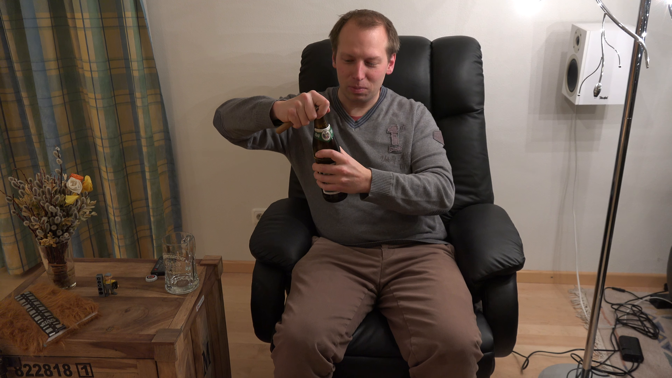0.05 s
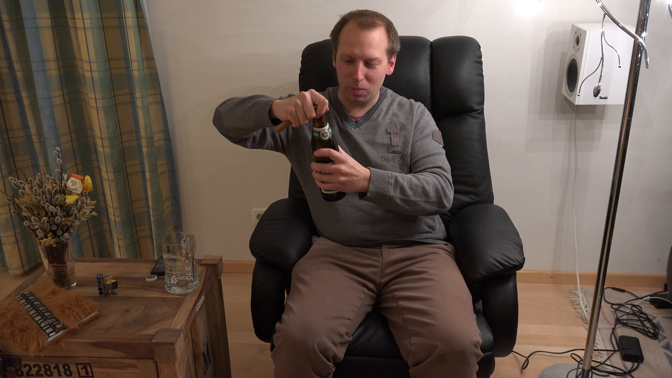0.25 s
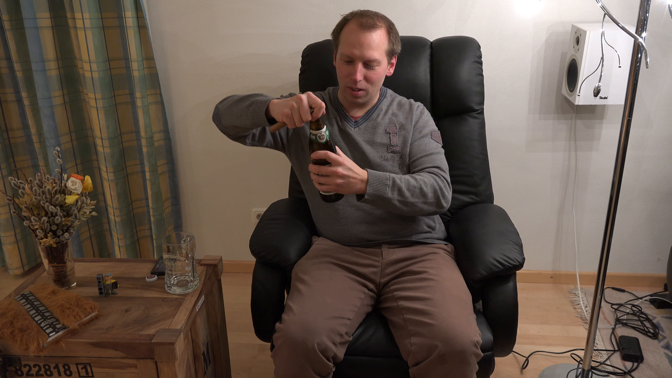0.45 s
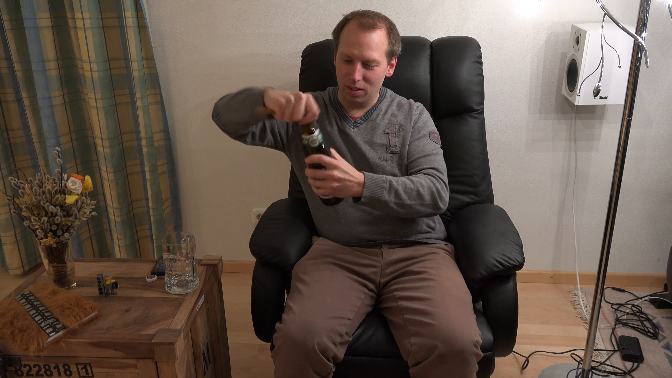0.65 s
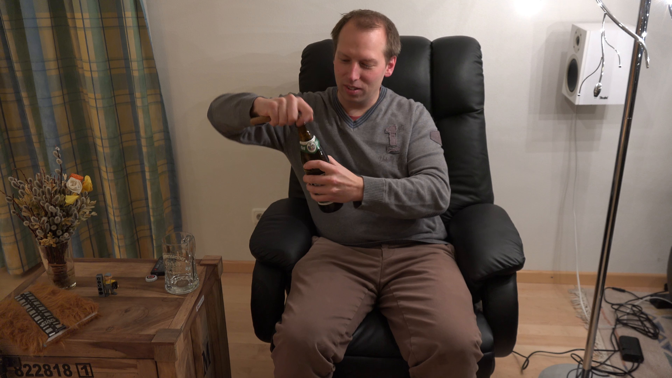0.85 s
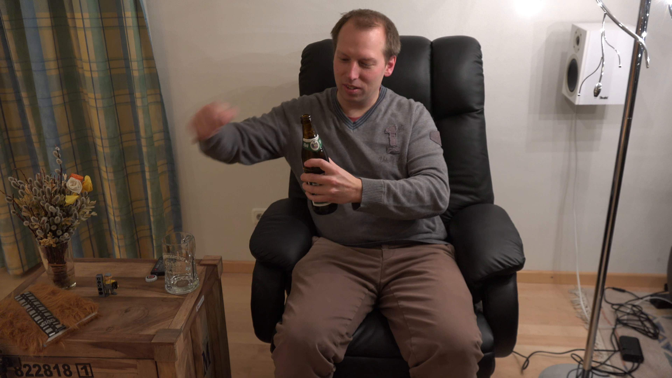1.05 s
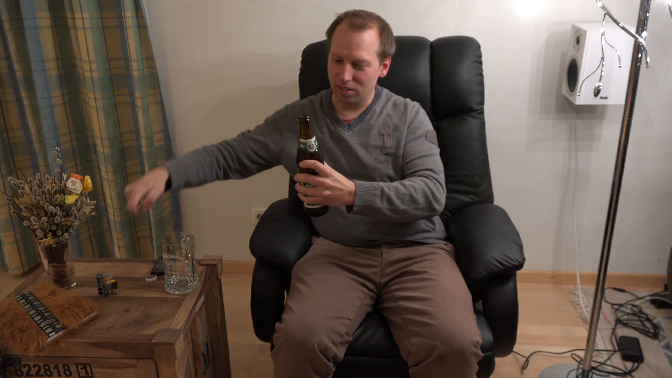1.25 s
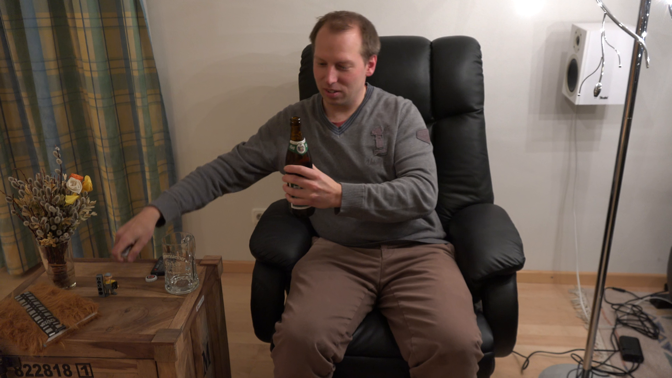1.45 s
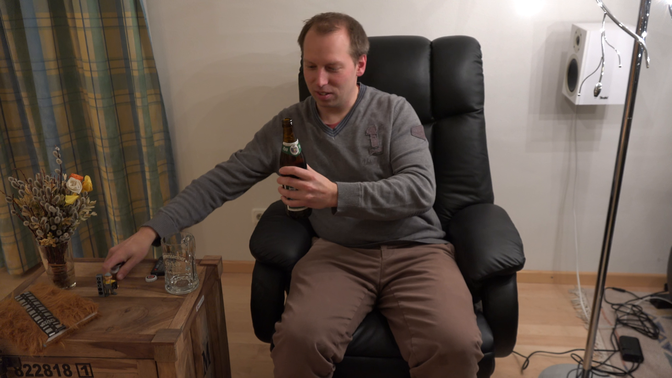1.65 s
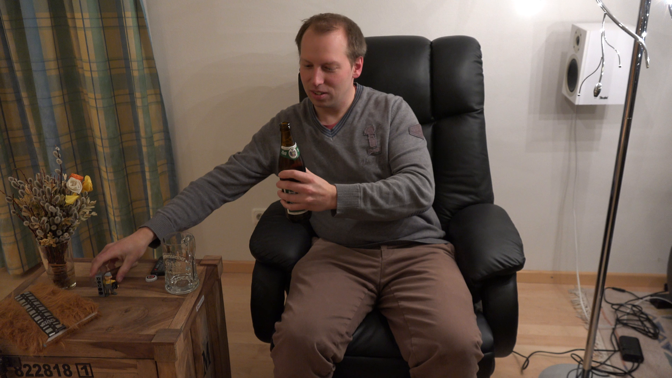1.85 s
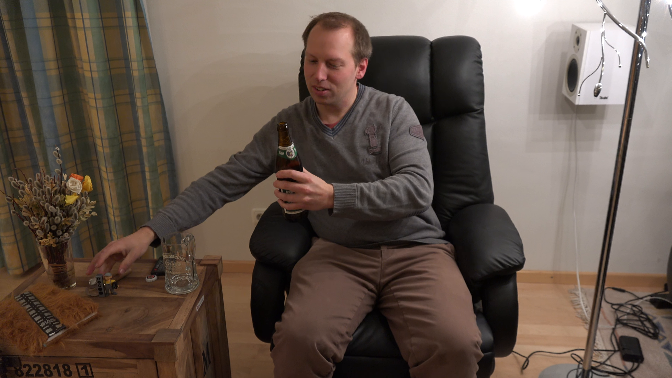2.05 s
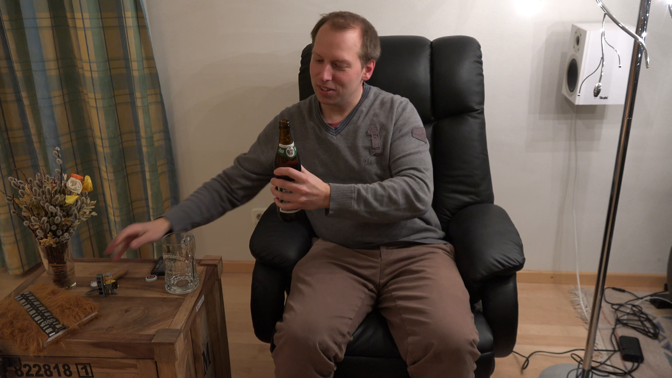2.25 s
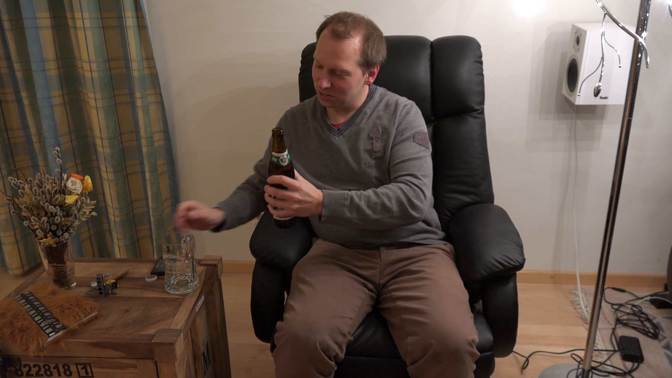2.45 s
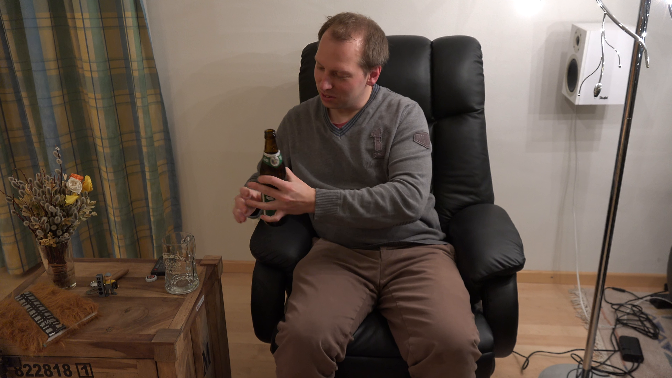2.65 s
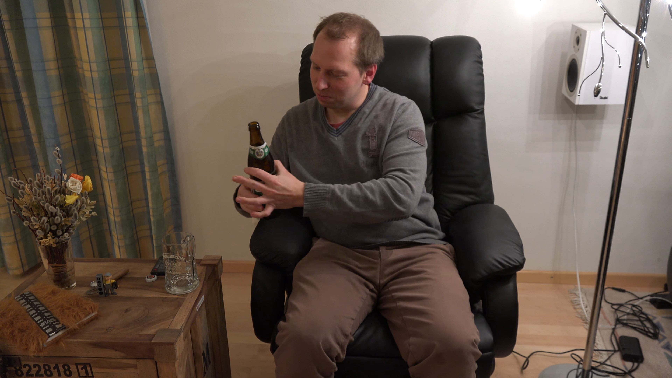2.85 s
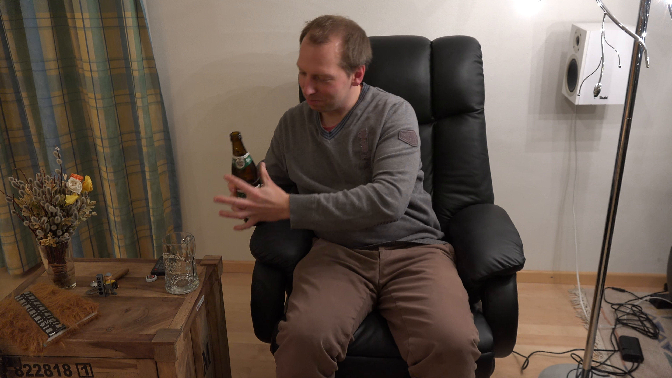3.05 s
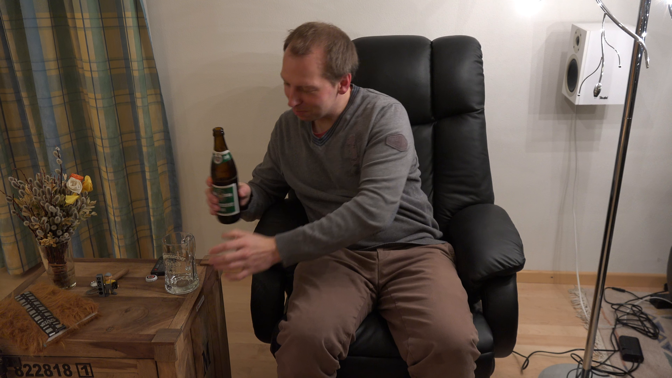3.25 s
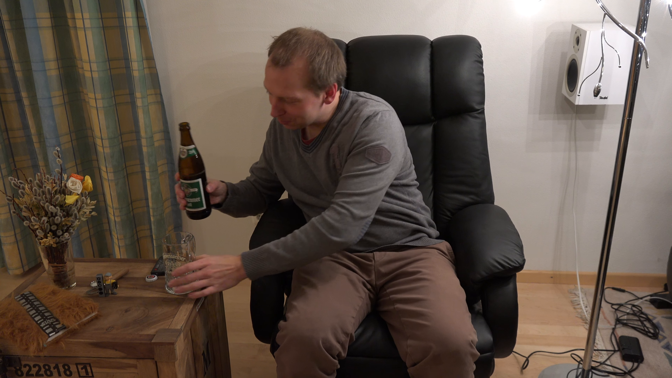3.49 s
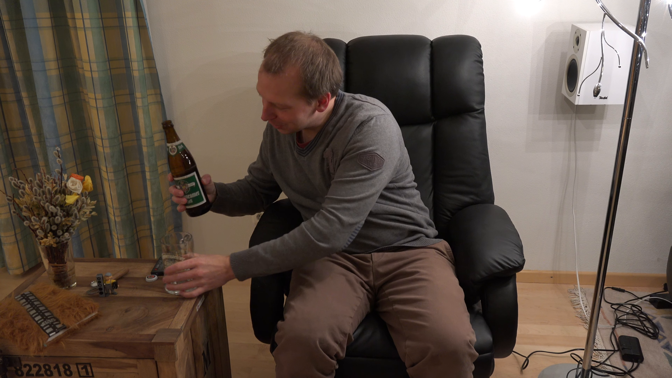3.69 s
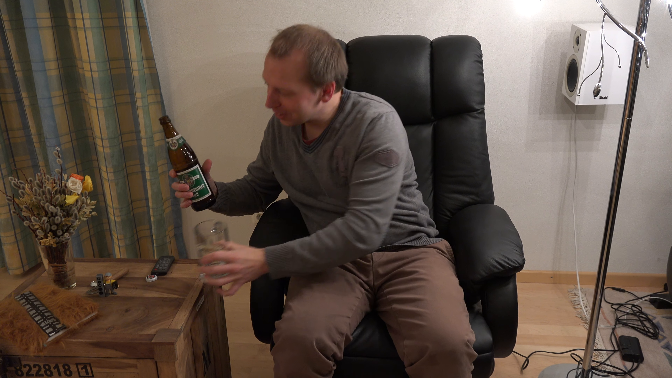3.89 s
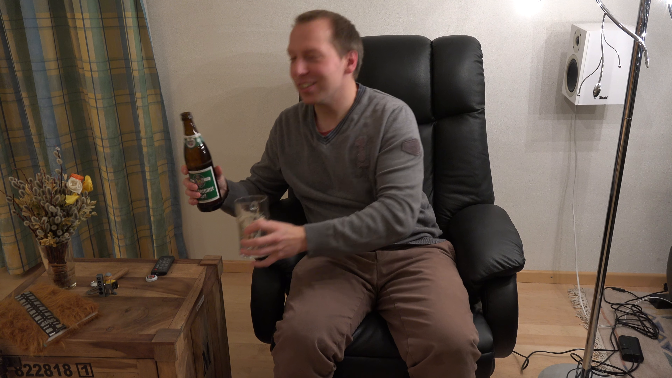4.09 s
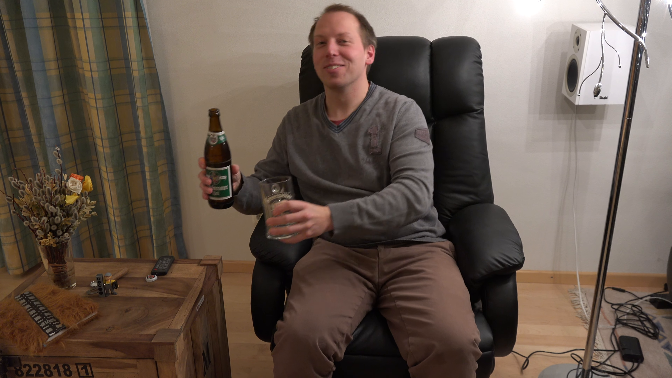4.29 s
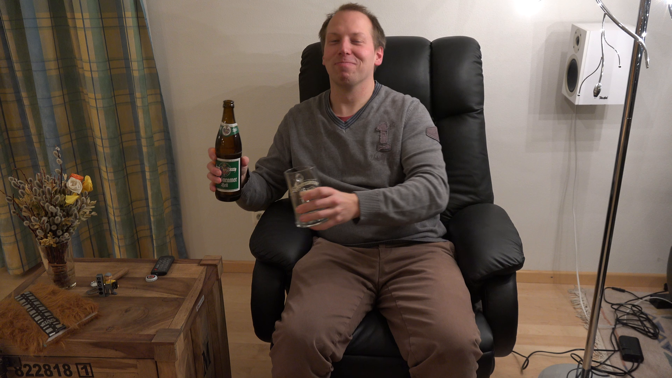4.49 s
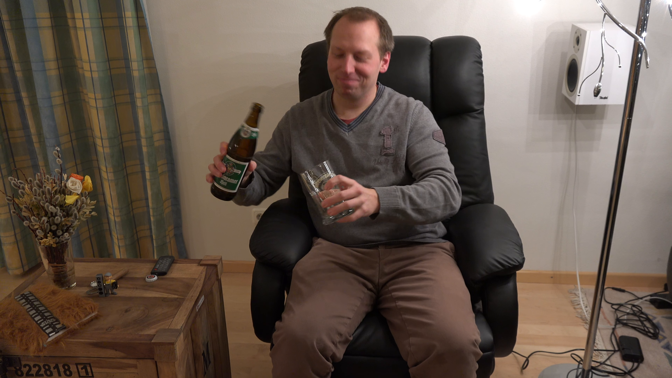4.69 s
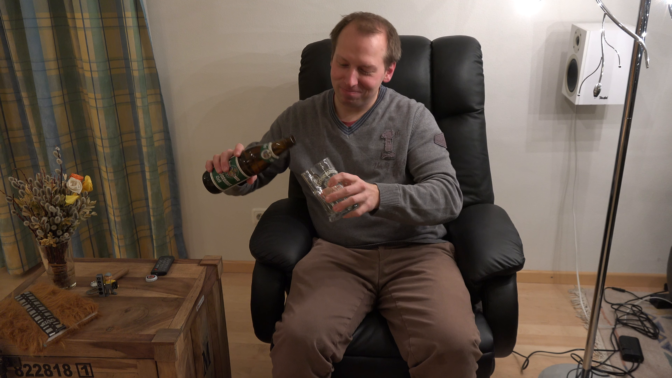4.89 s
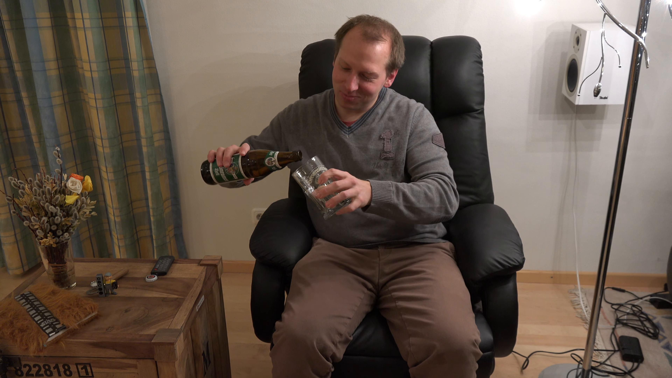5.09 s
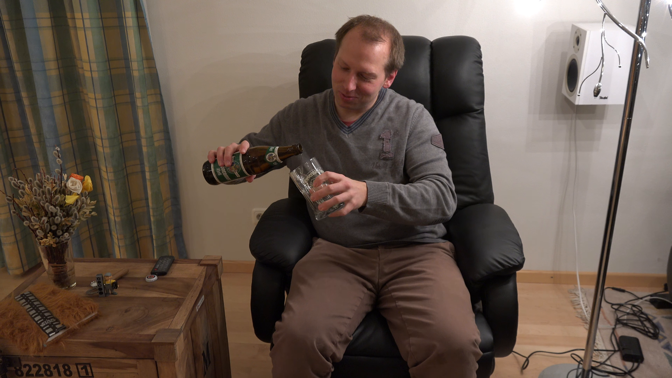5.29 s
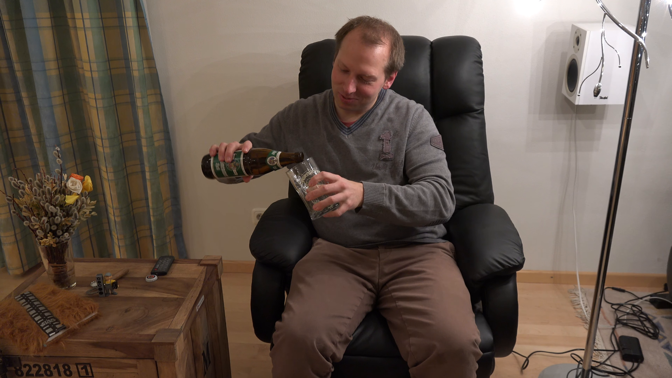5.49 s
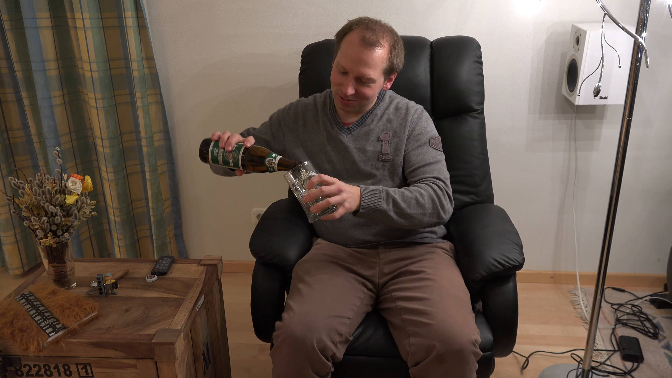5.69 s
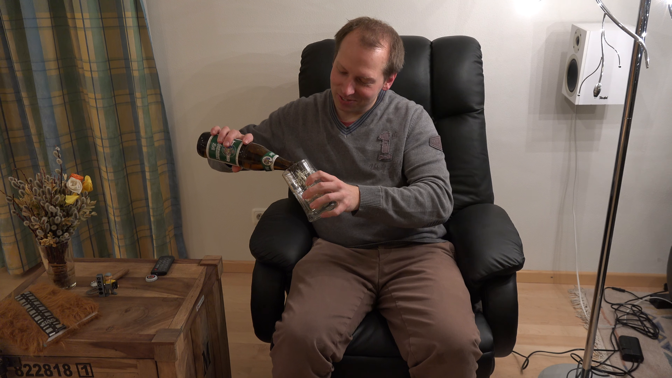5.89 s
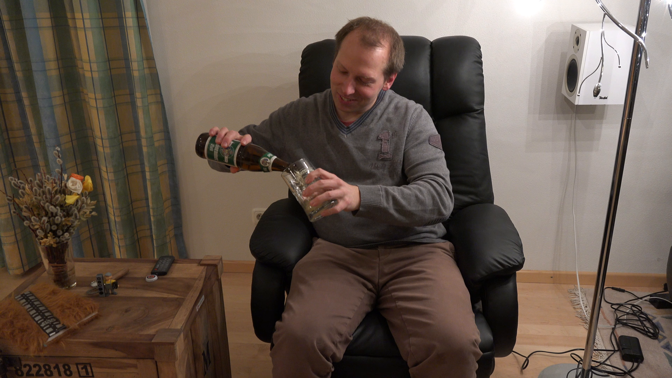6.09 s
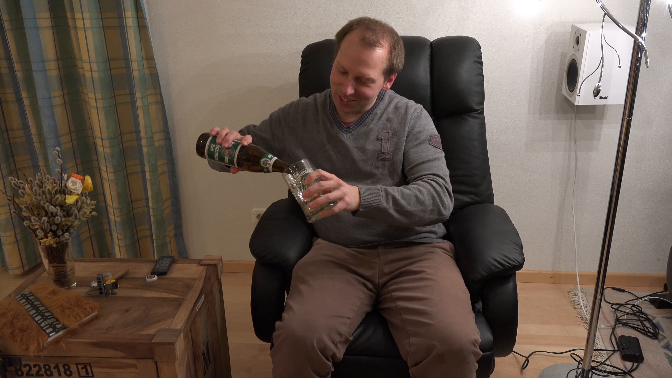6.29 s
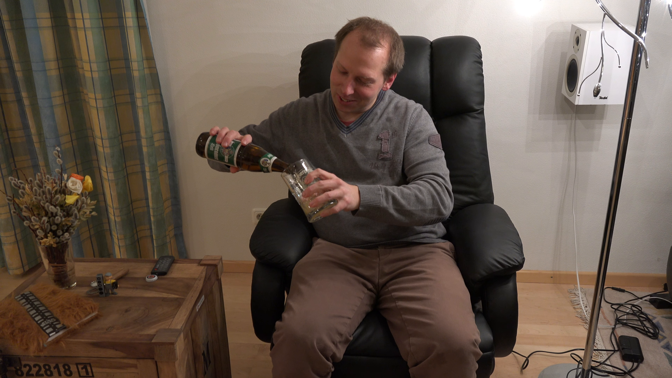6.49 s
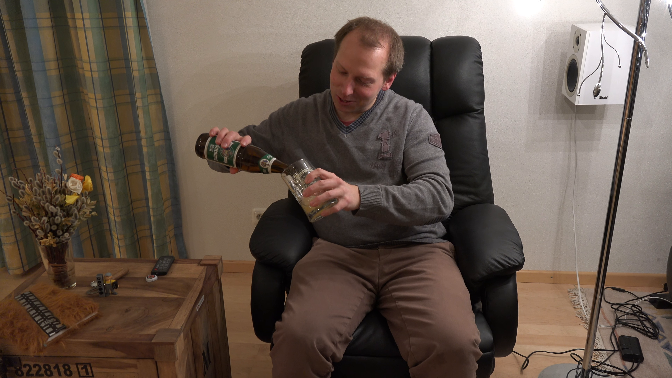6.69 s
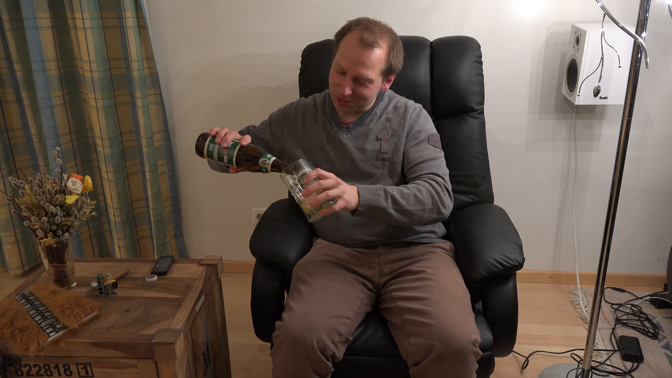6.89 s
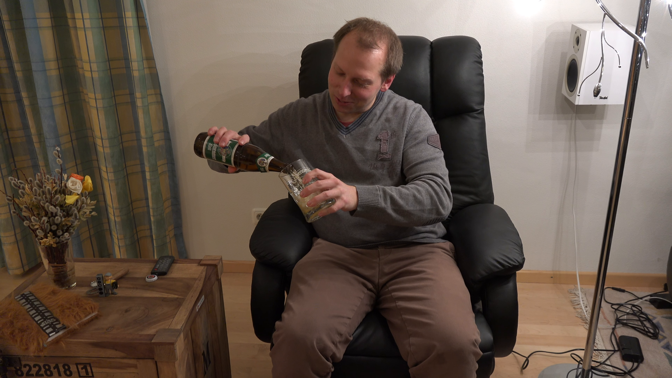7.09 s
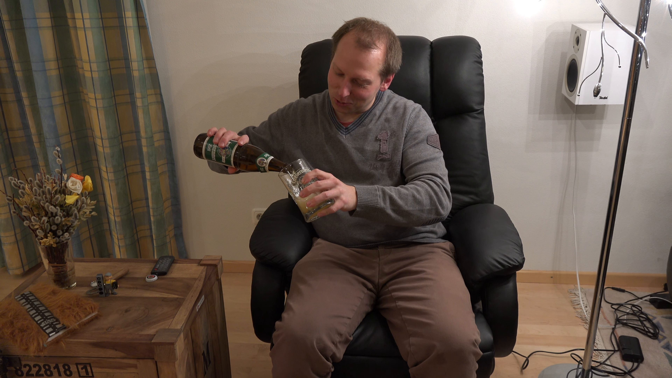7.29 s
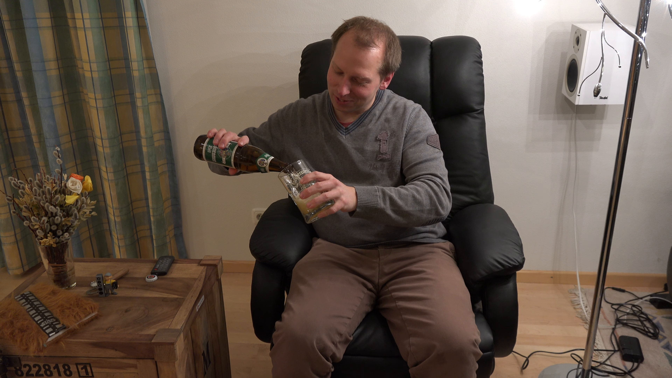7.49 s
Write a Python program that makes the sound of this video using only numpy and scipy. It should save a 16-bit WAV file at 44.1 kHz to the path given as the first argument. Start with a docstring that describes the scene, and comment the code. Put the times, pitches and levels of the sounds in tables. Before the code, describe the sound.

In a small living room with a faint low rumble, a beer bottle opens with a fading hiss and a short pop. The cap and opener tick together, then land on a wooden table in a bright, bouncing clatter, the loudest sound. Leather rubs and creaks as someone moves in an armchair, ending in a brief squeak. Finally beer pours into a glass, with softening glugs, bubbly plinks and light fizz, all with a short room echo.

```python
"""Gas hisses from under the cap of a beer bottle in a small living room, until the neck pops.
Cap and steel opener bounce on a wooden table, knocking the top and ringing the steel.
A leather armchair rubs, creaks and squeaks by stick-slip as the sitter fetches a glass.
Then the bottle glugs, each gulp ringing the air inside, and beer runs down the tilted glass,
trapping bubbles that ring under a fizzing head of foam."""
import sys
import numpy as np
from scipy import signal
from scipy.fft import rfft, irfft
from scipy.io import wavfile

SR = 44100
rng = np.random.default_rng(int(sys.argv[2]) if len(sys.argv) > 2 else 0)


def wav_record(signal):
    """Record a signal, one row per channel, as 16-bit PCM in the file named by sys.argv[1]."""
    frames = np.transpose(np.atleast_2d(signal))
    bounded = np.clip(frames, -1, 1)
    # unit amplitude maps onto the largest positive 16-bit level
    quanta = np.round(bounded * 32767).astype(np.int16)
    wavfile.write(sys.argv[1], SR, quanta)


N = 332910
T = np.arange(N) / SR
AGE = T[:SR // 2]  # time axis of one short event
TOP_HZ = 11050


def amp(db):
    """Decibels to gain."""
    return 10 ** (np.asarray(db) / 20)


def unit(x):
    """Scale to rms 1."""
    return x / np.sqrt(np.mean(x ** 2))


def at_level(x, db):
    """Scale a short sound to the energy of 10 ms at the given level."""
    return x * amp(db) / np.sqrt(np.sum(x ** 2) / (SR / 100))


def at_hz(points, hz):
    """Read a (Hz, value) table on a log-frequency axis."""
    point_hz, value = np.transpose(points)
    return np.interp(np.log(np.maximum(hz, 1)), np.log(point_hz), value)


def colour(x, points, size=4096):
    """Minimum-phase filter with the given (Hz, dB) response."""
    hz = np.arange(size // 2 + 1) * SR / size
    cepstrum = irfft(np.log(amp(at_hz(points, hz))))
    cepstrum[1:size // 2] *= 2
    cepstrum[size // 2 + 1:] = 0
    impulse = irfft(np.exp(rfft(cepstrum)))
    return signal.fftconvolve(x, impulse)[:len(x)]


def lowpass(x, hz):
    """Second-order low-pass."""
    return signal.sosfilt(signal.butter(2, min(hz, SR / 2 - 1), fs=SR, output="sos"), x)


def waver(hz, size):
    """Smooth random motion up to about hz, rms 1."""
    return unit(lowpass(rng.standard_normal(size), hz))


def since(start_s):
    """Seconds since the start, zero before it."""
    return np.maximum(T - start_s, 0)


def fade(t60_s, age=AGE):
    """Exponential decay."""
    return np.exp(-np.log(1000) * age / t60_s)


def swell(rise_s, age=AGE):
    """Exponential rise to 1."""
    return 1 - np.exp(-age / rise_s)


def ring(hz, t60_s, glide=0, age=AGE):
    """Damped mode, built up in a cycle or two; pitch climbs by the fraction glide as it dies."""
    bend = 1 + glide * np.minimum(age / t60_s, 1) / 2
    return swell(1 / hz, age) * fade(t60_s, age) * np.sin(2 * np.pi * hz * age * bend)


def burst(t60_s):
    """Decaying white noise."""
    return rng.standard_normal(len(AGE)) * fade(t60_s)


def add(track, start_s, x):
    """Mix x into the track."""
    i = max(int(start_s * SR), 0)
    track[i:i + len(x)] += x[:max(N - i, 0)]


# Background spectrum. Each row: frequency in Hz, gain in dB.
AMBIENCE_EQ = [(12, -36.5), (25, -15), (45, -6.5), (80, 0.5), (200, -2.5), (350, -8.5), (700, -15),
               (1400, -20.5), (2800, -26), (6000, -26), (11000, -33)]
def ambience(level_db=-59):
    """Steady low rumble of the room."""
    return amp(level_db) * unit(colour(rng.standard_normal(N), AMBIENCE_EQ))


# Room decay. Each row: frequency in Hz, T60 in seconds.
ROOM_DECAY = [(120, 1), (500, 0.52), (2000, 0.68), (5000, 0.52), (10000, 0.38)]
# Reverb spectrum. Each row: frequency in Hz, gain in dB.
ROOM_EQ = [(80, -4), (200, 3.5), (700, 1), (2000, -0.5), (5000, -1.5), (8000, -3), (11000, -8.5)]
def room(x, gap_s=0.0039, build_s=0.004):
    """Walls and floor answer after a few milliseconds; the treble dies first."""
    age = T[:SR * 3 // 2]
    spectrum = rfft(rng.standard_normal(len(age)))
    hz = np.arange(len(spectrum)) * SR / len(age)
    centres_hz = np.geomspace(60, 12000, 12)
    tail = 0
    for centre_hz, pick in zip(centres_hz, np.eye(len(centres_hz))):
        band = irfft(spectrum * at_hz(np.c_[centres_hz, pick], hz), len(age))
        tail = tail + band * fade(at_hz(ROOM_DECAY, centre_hz), age)
    onset = np.clip((age - gap_s) / build_s, 0, 1)
    tail = colour(tail * onset, ROOM_EQ)
    midrange = np.abs(rfft(tail))[(hz > 500) & (hz < 3000)]
    return signal.fftconvolve(x, tail / np.sqrt(np.mean(midrange ** 2)))[:N]


# Movements in the chair. Each row: start and length in seconds, level in dB, rasp offset in dB.
MOVEMENTS = [(1.23, 0.23, -58.5, -1.5), (1.463, 0.56, -51, -3.5), (1.947, 0.54, -54.5, -2.5),
             (2.404, 0.48, -62, -1), (3.016, 0.082, -51, -11), (3.14, 0.21, -38.5, -3),
             (3.402, 0.12, -44.5, -10), (3.599, 0.062, -40.5, -2), (3.755, 0.82, -58.5, -4.5),
             (3.918, 0.21, -50, -7.5), (4.162, .15, -41.5, -9.5), (4.664, .15, -40, -4)]
def rub_envelopes(attack_s=0.029, release_s=0.018, settle_db=-6, settle_s=0.074):
    """Body and rasp gains: each movement starts, holds, stops and leaves the upholstery settling."""
    body_power = rasp_power = 0
    settle = amp(settle_db)
    for start_s, length_s, db, rasp_db in MOVEMENTS:
        attack = np.minimum(since(start_s) / attack_s, 1)
        after_s = since(start_s + length_s)
        release = (1 - settle) * np.exp(-after_s / release_s) + settle * np.exp(-after_s / settle_s)
        power = (amp(db) * attack * release) ** 2
        body_power += power
        rasp_power += power * amp(rasp_db) ** 2
    return np.sqrt(body_power), np.sqrt(rasp_power)


# Spectra of the leather and its grain. Each row: frequency in Hz, gain in dB.
LEATHER_EQ = [(40, -25), (75, 0.5), (130, -3), (290, -0.5), (450, -4.5), (800, -5.5), (1000, -5.5),
              (1350, -5.5), (2000, -11.5), (3200, -37)]
GRAIN_EQ = [(900, -21.5), (1500, -0.5), (1930, 0), (2950, -4.5), (3700, -5), (4500, -6), (5900, -13.5),
            (6500, -11.5), (7200, -16.5), (11000, -31)]
# Chair frame modes. Each row: frequency in Hz, bandwidth in Hz, gain in dB.
FRAME_MODES = [(232, 410, -3.5), (355, 50, 0.5), (642, 30, 0), (750, 76, 1.5), (827, 61, 0.5),
               (1046, 39, -7.5), (1850, 130, -6), (3490, 340, -12.5)]
def leather_rub(slip_hz=130, scatter_db=4, drag_db=-3, frame_db=-7, body_db=-1, grain_db=-2):
    """Leather sticks and slips unevenly, shaking the upholstered frame; its grain adds a rasp."""
    timing, force = rng.standard_normal((2000, 2)).T
    gaps_s = np.exp(0.4 * timing) / slip_hz
    slips = np.zeros(N)
    for start_s, size in zip(np.cumsum(gaps_s), amp(scatter_db * force)):
        add(slips, start_s, np.array([size]))
    friction = unit(unit(slips) + amp(drag_db) * rng.standard_normal(N))
    modes = sum(amp(db) * width_hz * ring(hz, np.log(1000) / (np.pi * width_hz))
                for hz, width_hz, db in FRAME_MODES)
    frame = unit(signal.fftconvolve(friction, modes)[:N])
    body = unit(unit(colour(friction, LEATHER_EQ)) + amp(frame_db) * frame)
    rasp = unit(colour(friction + 1.7 * rng.standard_normal(N), GRAIN_EQ))
    body_gain, rasp_gain = rub_envelopes()
    return amp(body_db) * body_gain * body + amp(grain_db) * rasp_gain * rasp


# Sudden slips. Each row: start in seconds, level in dB, cut-off in Hz.
LEATHER_SLIPS = [(1.2537, -41, 1390), (1.4177, -39, 1300), (1.476, -41.5, 1280), (2.994, -43.5, 5940),
                 (3.062, -43, 2500), (3.098, -40.5, 2530), (3.382, -35.5, 4900), (3.449, -33.5, 5430),
                 (3.5574, -32, 5440), (3.596, -32.5, 5500), (3.627, -37.5, 4900), (4.207, -36.5, 1200),
                 (4.28, -39, 2970)]
def leather_creaks(t60_s=0.11):
    """Each sudden slip of the leather gives a snap of noise."""
    snap_eq = [(60, -10), (180, 6.5), (800, -1), (1400, -6.5),
               (2800, -9.5), (3600, -4), (7000, -11), (11000, -11.5)]
    out = np.zeros(N)
    for start_s, db, cutoff_hz in LEATHER_SLIPS:
        snap = colour(burst(t60_s), snap_eq)
        add(out, start_s, at_level(lowpass(snap, cutoff_hz), db))
    return out


def leather_squeak(start_s=4.175, attack_s=0.027, t60_s=0.6, level_db=-40.5,
                   steady_hz=986, scoop_hz=80, scoop_s=0.029, jitter=0.0196, jitter_hz=153):
    """The sitter leans back: fast, unsteady stick-slip gives a rough pitch that climbs and levels."""
    age = since(start_s)
    hz = steady_hz - scoop_hz * np.exp(-age / scoop_s)
    phase = 2 * np.pi * np.cumsum(hz * (1 + jitter * waver(jitter_hz, N))) / SR
    tone = unit(np.sin(phase) + amp(-4) * np.sin(2 * phase) + amp(-10) * np.sin(3 * phase))
    envelope = np.minimum(age / attack_s, 1) * fade(t60_s, age)
    return amp(level_db) * envelope * tone


# Metal ticks. Each row: start in seconds, level in dB, centre in Hz.
CAP_TICKS = [(.385, -55, 4800), (.397, -51.5, 4400), (.924, -60.5, 2860), (1.046, -61.5, 3587),
             (1.3, -44.5, 4113), (1.33, -43, 4100), (1.362, -53, 4320)]
def cap_ticks(t60_s=0.018, skirt_db=-16):
    """Cap and opener tick together in the hand."""
    out = np.zeros(N)
    for start_s, db, hz in CAP_TICKS:
        peak_eq = [(hz / 8, -28), (hz / 1.4, skirt_db), (hz, 0), (hz * 1.3, skirt_db), (hz * 2, -28)]
        add(out, start_s, at_level(colour(burst(t60_s), peak_eq), db))
    return out


# Leak spectrum. Each row: frequency in Hz, gain in dB.
HISS_EQ = [(600, -16), (1500, -9.5), (3100, -3.5), (4000, -4), (6500, 1), (8500, -0.5), (11000, -10.5)]
def gas_hiss(level_db=-36.5, t60_s=0.41):
    """Gas leaks under the lifted cap, dying away as the pressure falls."""
    return amp(level_db) * fade(t60_s, T) * unit(colour(rng.standard_normal(N), HISS_EQ))


# Gas puff spectrum. Each row: frequency in Hz, gain in dB.
PUFF_EQ = [(300, -30), (1100, -7), (2400, -14), (3900, -4.5), (4500, -11.5), (6200, -13), (8500, -15.5),
           (11000, -33)]
def neck_pop(start_s=0.5518, neck_hz=520, neck_db=-31, neck_t60_s=0.051, puff_db=-36, puff_t60_s=0.081):
    """The cap lets go: gas bursts out and rings the air in the neck."""
    out = np.zeros(N)
    add(out, start_s, at_level(ring(neck_hz, neck_t60_s), neck_db))
    add(out, start_s, at_level(colour(burst(puff_t60_s), PUFF_EQ), puff_db))
    return out


# Table top modes. Each row: frequency in Hz, gain in dB, T60 in seconds.
TABLE_MODES = [(198, -8, 0.13), (347, -6.5, .12), (510, -2, 0.066), (703, -3.5, 0.059), (702, -3.5, 0.15),
               (998, -8.5, 0.07), (1243, -3, 0.063), (1458, 2.5, 0.065), (1740, -2.5, 0.069),
               (2080, -1.5, 0.02), (2201, -1.5, .05), (2550, 1, .03), (2934, 0.5, .06), (3300, -2.5, 0.036)]
# Impact spectrum. Each row: frequency in Hz, gain in dB.
KNOCK_EQ = [(30, -26), (90, -16.5), (200, 2.5), (380, -3.5), (720, 3), (1000, -0.5), (1500, -1),
            (2900, -3.5), (4000, -2.5), (7000, -6.5), (11000, -9)]
def table_knock(contact_hz, crack_t60_s=0.011, thud_t60_s=0.05, modes_db=-6, low_cut_ratio=0.043):
    """One blow on wood: a soft contact has less treble, a light hard one hardly moves the low modes."""
    board = sum(rng.choice([-1, 1]) * amp(db) * ring(hz, t60_s) for hz, db, t60_s in TABLE_MODES)
    crack = at_level(burst(crack_t60_s), 0)
    thud = at_level(burst(thud_t60_s), 0)
    impact = colour(crack + thud, KNOCK_EQ)
    wood = lowpass(at_level(impact, 0) + at_level(board, modes_db), contact_hz)
    low_cut = signal.butter(1, low_cut_ratio * contact_hz, "high", fs=SR, output="sos")
    return signal.sosfilt(low_cut, wood)


# Opener modes. Each row: frequency in Hz, gain in dB, T60 in seconds, group (0 low, 1 middle, 2 high).
OPENER_MODES = [(4736, -1.5, 0.1, 0), (4816, -9, .1, 0), (5780, -16.5, 0.022, 0), (6150, -16, 0.066, 0),
                (6790, -5, 0.068, 1), (7260, -13, 0.027, 1), (8730, -6.5, 0.013, 2), (9100, -7.5, 0.042, 2)]
# Bounces. Each row: start in seconds, wood level in dB, contact cut-off in Hz, steel gain in dB,
# strike place (0 rings the low modes, 1 the middle ones).
BOUNCES = [(1.607, -59.5, 3080, -45.5, 0.074), (1.6888, -26.5, 3200, -42.5, 0.35),
           (1.697, -28.5, 4913, -27, .17), (1.714, -25, 5476, -21, 0.76),
           (1.7679, -30.5, 11040, -15.5, 0.23), (1.783, -41.5, 8710, -28.5, 0.28),
           (1.809, -14, 1647, -30.5, .15), (1.838, -24.5, 2300, -32.5, 0.14),
           (1.8599, -10.5, 4436, -30, 0.28), (1.875, -14.5, 3283, -30, .15),
           (1.896, -27, 4260, -29.5, 0.67), (1.914, -27.5, 2250, -41, 0.78), (1.9593, -47, 3703, -31, 0.21),
           (2.0201, -51, 3240, -26, 0.1), (2.038, -33, 4500, -35.5, 0.91), (2.1721, -33, 4770, -30.5, 0.64)]
def clatter(chatter_depth=0.46, chatter_hz=200, hard_contact_hz=5000, detune=0.0007):
    """Each bounce knocks the table and rings the steel, which chatters against the wood."""
    out = np.zeros(N)
    for start_s, wood_db, contact_hz, steel_db, place in BOUNCES:
        add(out, start_s, at_level(table_knock(contact_hz), wood_db))
        angle = place * np.pi / 2
        hardness = 1 / (1 + (hard_contact_hz / contact_hz) ** 2)  # sharp contacts wake the high modes
        group_gains = np.cos(angle), np.sin(angle), hardness
        for hz, db, t60_s, group in OPENER_MODES:
            chatter = 1 + chatter_depth * waver(chatter_hz, len(AGE))
            mode = ring(hz * (1 + detune * rng.standard_normal()), t60_s)
            add(out, start_s, group_gains[group] * at_level(chatter * mode, db + steel_db))
    return out


# Air pocket modes. Each row: frequency ratio, gain in dB.
CAVITY_MODES = [(1, -6.5), (1.95, -9.5), (3.03, -4.5), (3.8, -28), (4.03, -2.5), (5.95, -8), (7, -18)]
# Thump spectrum. Each row: frequency in Hz, gain in dB.
THUMP_EQ = [(70, -11), (150, 5.5), (280, 5.5), (420, 1.5), (650, 16), (1000, -12.5), (1900, 2), (2600, -10),
            (4600, -0.5), (6000, -9.5), (11000, -24.5)]
# Gulps of air. Each row: start in seconds, ring level in dB, cavity pitch in Hz, thump level in dB.
GULPS = [(5.5799, -31.5, 599, -37), (5.7585, -48.5, 601, -57), (6.038, -44, 616, -46),
         (6.324, -39.5, 654, -44), (6.6619, -51, 654, -48.5), (7.014, -54, 709, -53),
         (7.3816, -50, 738, -54.5)]
def glugs(first_t60_s=0.069, late_t60_s=0.011, neck_fill_s=0.34, overtone_life=0.25, glide=0.0068,
          swell_s=0.0072, thump_t60_s=0.037, slosh_hz=262, slosh_t60_s=0.0093, slosh_db=-54.5):
    """Each gulp rings the bottle's air pocket and thumps the beer, which sloshes back."""
    out = np.zeros(N)
    for start_s, ring_db, hz, thump_db in GULPS:
        # the ring shortens as beer fills the neck
        unfilled = np.exp((GULPS[0][0] - start_s) / neck_fill_s)
        t60_s = late_t60_s + (first_t60_s - late_t60_s) * unfilled
        cavity = sum(amp(db) * ring(hz * ratio, t60_s * (overtone_life if i else 1), glide)
                     for i, (ratio, db) in enumerate(CAVITY_MODES))
        add(out, start_s, at_level(cavity * swell(swell_s), ring_db))
        add(out, start_s, at_level(colour(burst(thump_t60_s), THUMP_EQ), thump_db))
        add(out, start_s, at_level(ring(slosh_hz, slosh_t60_s), slosh_db))
    return out


POUR_S, SPLASH_FROM_S = 5.55, 5.95  # the bottle tips; surges, gulp splashes and stray drips can begin

# Fizz spectrum. Each row: frequency in Hz, gain in dB.
FOAM_EQ = [(1500, 1.5), (3500, 12.5), (5500, 4.5), (8000, 3.5), (11000, 2.5)]
def foam(bursts_per_s=1400, grow_s=0.3, level_db=-66, scatter_db=1.5):
    """Tiny bubbles burst in the growing head."""
    clicks = (rng.random(N) < bursts_per_s / SR) * rng.standard_normal(N)
    clicks *= amp(scatter_db * np.minimum(rng.exponential(size=N), 4))
    growth = np.minimum(since(POUR_S) / grow_s, 1)
    return amp(level_db) * growth * unit(colour(clicks, FOAM_EQ))


def bubble(hz, t60_s, db, age=AGE, glide=0.011, swell_s=0.00082):
    """Trapped air rings with a slightly rising pitch."""
    return at_level(ring(hz, t60_s, glide, age) * swell(swell_s, age), db)


# Distinct bubbles and drops. Each row: start in seconds, level in dB, pitch in Hz, T60 in seconds.
SINGLE_BUBBLES = [(5.76, -49, 3120, .045), (5.828, -44, 3370, .025), (5.828, -47, 3730, 0.014),
                  (5.831, -47, 6370, 0.0027), (5.9077, -44.5, 2730, .025), (6.104, -49.5, 2820, .008),
                  (6.103, -54, 1310, .02), (6.138, -48, 3180, 0.024), (6.152, -45.5, 812, 0.32),
                  (6.191, -45.5, 755, 0.02), (6.5152, -59.5, 2080, .036), (6.577, -56, 4900, 0.0013),
                  (6.936, -59, 4400, .0015), (7.1142, -59.5, 2750, 0.0027), (7.215, -41.5, 6440, 0.13)]
def plinks(splash_hz=4560, splash_t60_s=0.02, splash_offset_db=-7,
           drip_hz=3830, drip_t60_s=0.0089, drip_db=-65, spread=0.216, scatter_db=6.5, drips=12):
    """Single bubbles ring in the glass, with a splash at each later gulp and faint stray drips."""
    out = np.zeros(N)
    for start_s, db, hz, t60_s in SINGLE_BUBBLES:
        add(out, start_s, bubble(hz, t60_s, db))
    for start_s, _, _, thump_db in GULPS:
        if start_s > SPLASH_FROM_S:
            add(out, start_s, bubble(splash_hz, splash_t60_s, thump_db + splash_offset_db))
    starts_s = rng.uniform(SPLASH_FROM_S, GULPS[-1][0], drips)
    for start_s, (loud, pitch) in zip(starts_s, rng.standard_normal((drips, 2))):
        hz = drip_hz * np.exp(spread * pitch)
        add(out, start_s, bubble(hz, drip_t60_s, drip_db + scatter_db * min(loud, 1)))
    return out


# First gush, digging ever larger bubbles. Each row: time in seconds, level in dB, typical pitch in Hz.
FIRST_GUSH = [(5.8, -60, 3100), (5.98, -60, 2840), (6.12, -51.5, 1960), (6.22, -76, 1130)]
def flow(trickle_db=-88, trickle_hz=2915, surge_db=-57.5, surge_peak_s=0.021, db_per_thump_db=4.1):
    """Stream gain and typical bubble pitch: a trickle, the first gush, a surge after each later gulp."""
    times_s, gush_db, gush_hz = np.transpose(FIRST_GUSH)
    gushing = (T >= times_s[0]) & (T < times_s[-1])
    power = amp(trickle_db) ** 2 + gushing * amp(np.interp(T, times_s, gush_db)) ** 2
    later_gulps = [(start_s, db) for start_s, _, _, db in GULPS if start_s > SPLASH_FROM_S]
    strongest_db = max(db for _, db in later_gulps)
    for start_s, thump_db in later_gulps:
        progress = since(start_s) / surge_peak_s
        peak = amp(surge_db + db_per_thump_db * (thump_db - strongest_db))
        power += (peak * progress * np.exp(1 - progress)) ** 2
    return np.sqrt(power), np.where(gushing, np.interp(T, times_s, gush_hz), trickle_hz)


def stream(count=3000, spread=0.459, cycles=40, cycles_spread=0.25, scatter_db=6.5):
    """Beer running down the glass traps bubbles of all sizes."""
    bubbles, age = np.zeros(N), AGE[:SR // 20]
    gain, typical_hz = flow()
    starts_s = rng.uniform(POUR_S, T[-1], count)
    for start_s, (pitch, loud, life) in zip(starts_s, rng.standard_normal((count, 3))):
        hz = np.clip(typical_hz[int(start_s * SR)] * np.exp(spread * pitch), 500, TOP_HZ)
        t60_s = cycles * np.exp(cycles_spread * life) / hz  # short lives splash, long ones sing
        add(bubbles, start_s, bubble(hz, t60_s, scatter_db * min(loud, 2), age))
    return gain * bubbles / np.std(bubbles[T > POUR_S])


def scene(cap_wet_db=-6, table_wet_db=-4, chair_wet_db=-5, beer_wet_db=-4):
    """All sources share one room; both channels are the same."""
    cap = gas_hiss() + cap_ticks() + neck_pop()
    table = clatter()
    chair = leather_rub() + leather_creaks() + leather_squeak()
    beer = glugs() + stream() + foam() + plinks()
    reverb = room(amp(cap_wet_db) * cap + amp(table_wet_db) * table
                  + amp(chair_wet_db) * chair + amp(beer_wet_db) * beer)
    return np.tile(cap + table + chair + beer + reverb + ambience(), (2, 1))


def record(dry):
    """Round the loudest peaks and cut the top."""
    rounded = 0.95 * np.tanh(dry / 0.95)
    return signal.sosfilt(signal.ellip(10, 0.2, 85, TOP_HZ, fs=SR, output="sos"), rounded)


dry = scene()
out = record(dry)
wav_record(out)
```